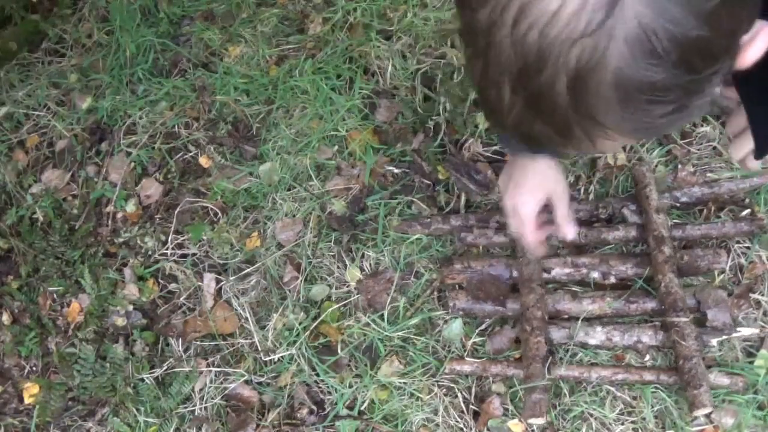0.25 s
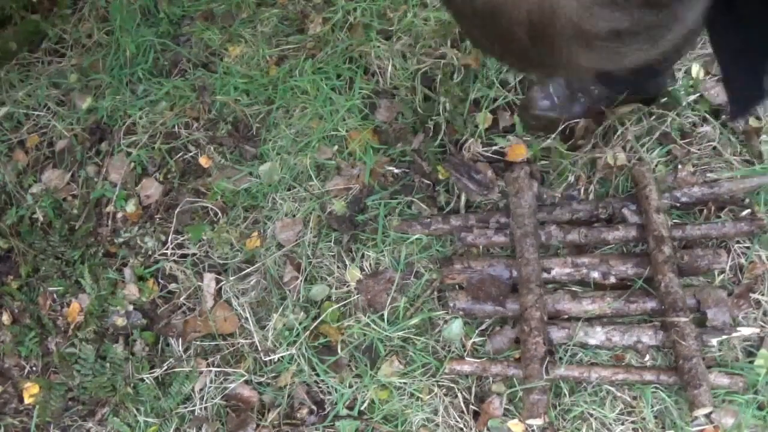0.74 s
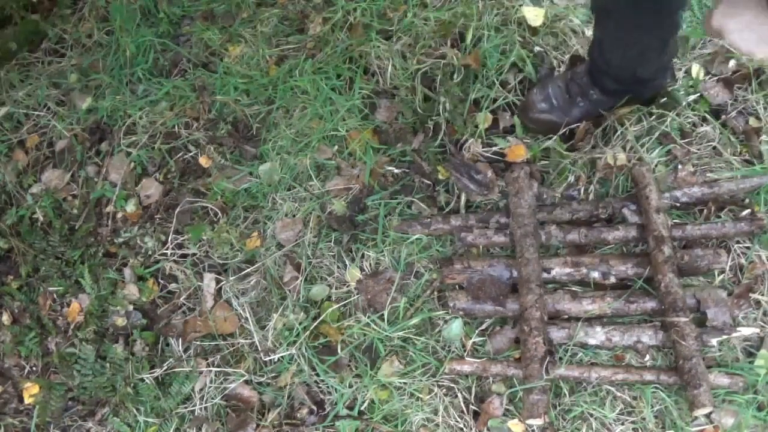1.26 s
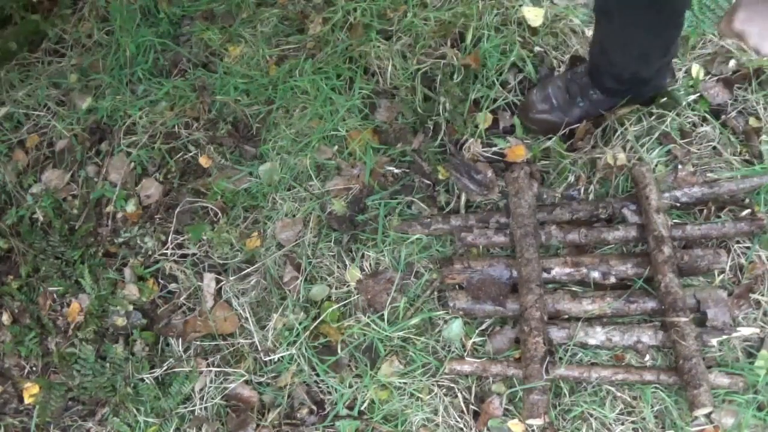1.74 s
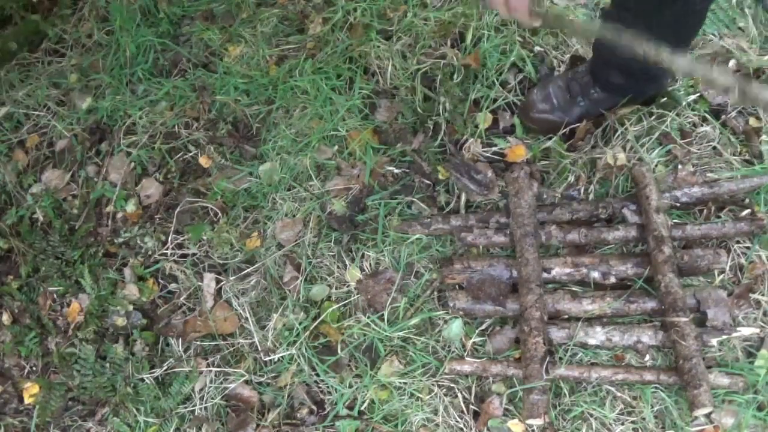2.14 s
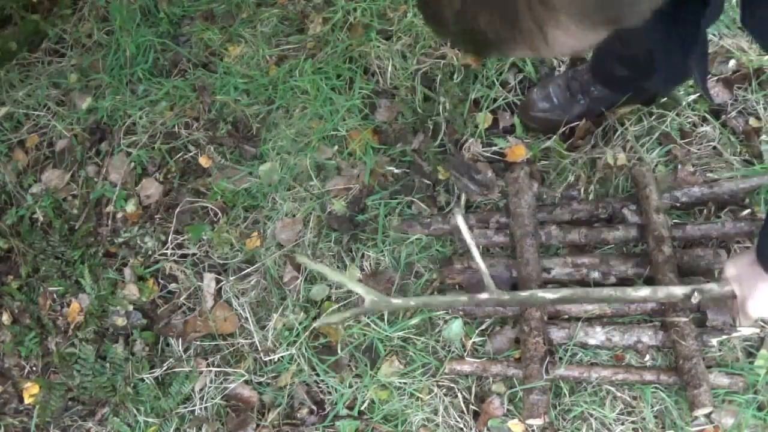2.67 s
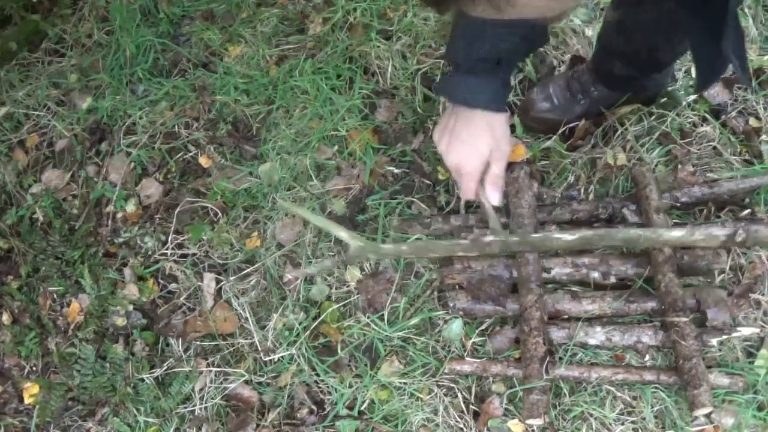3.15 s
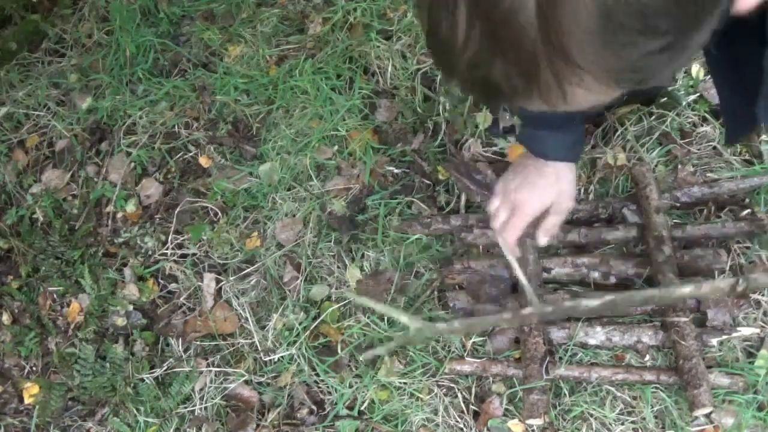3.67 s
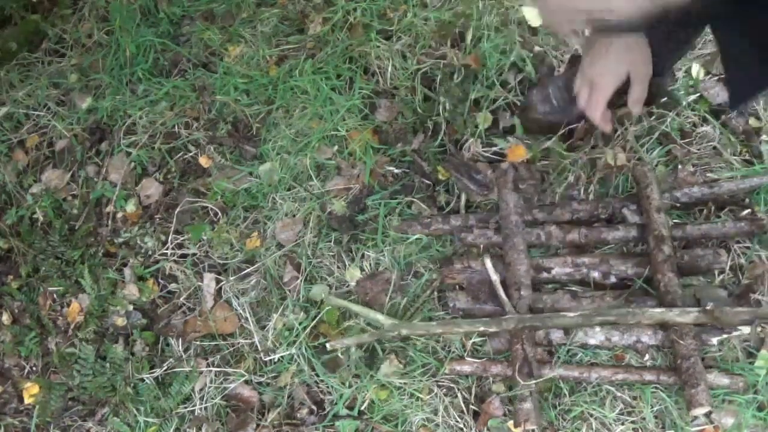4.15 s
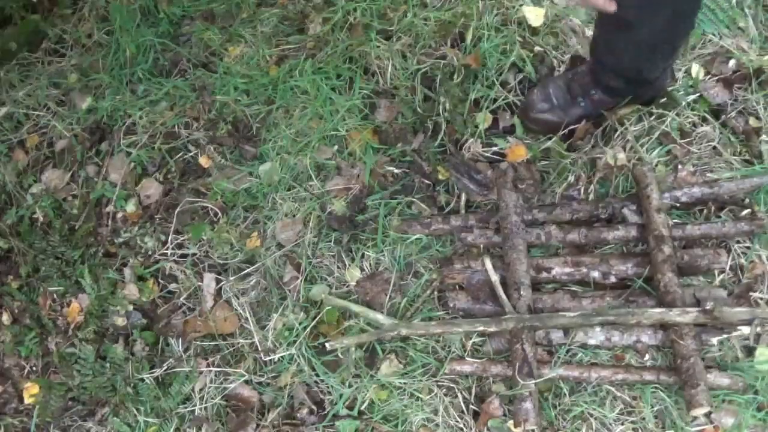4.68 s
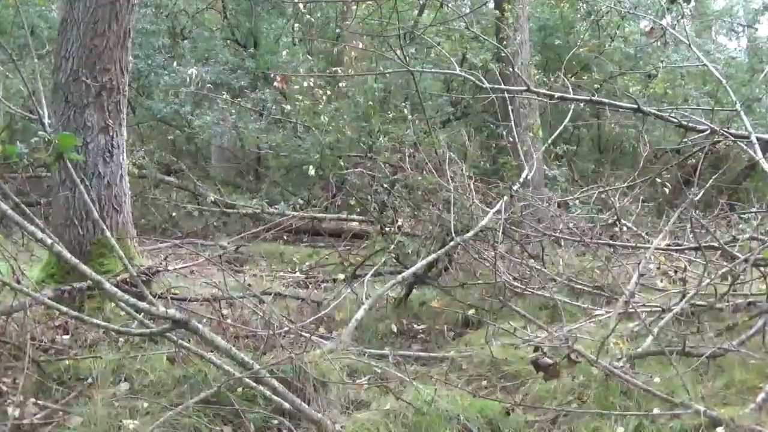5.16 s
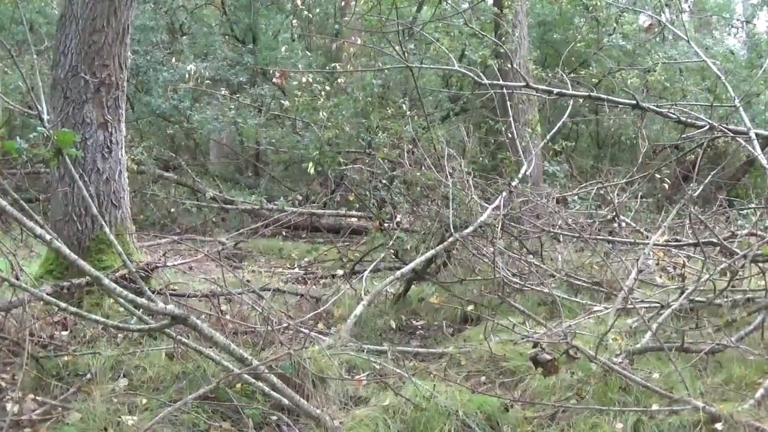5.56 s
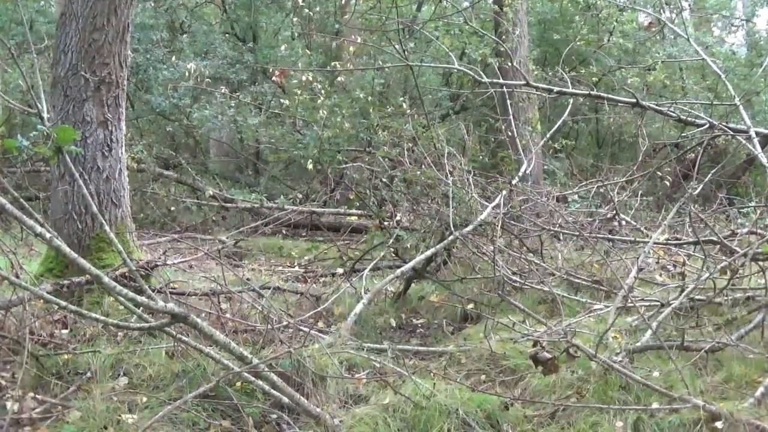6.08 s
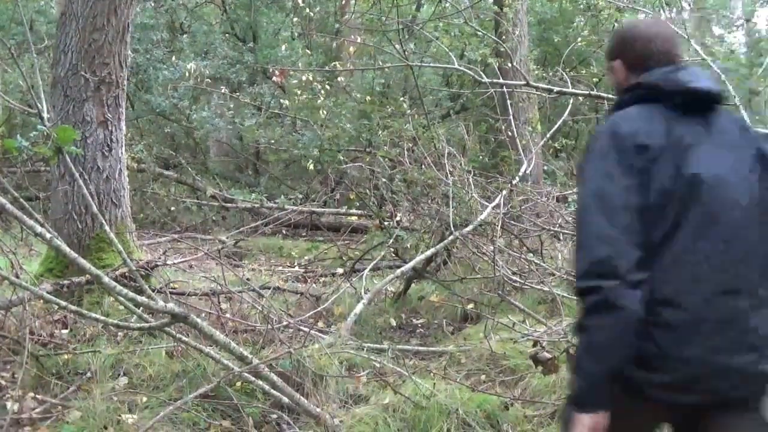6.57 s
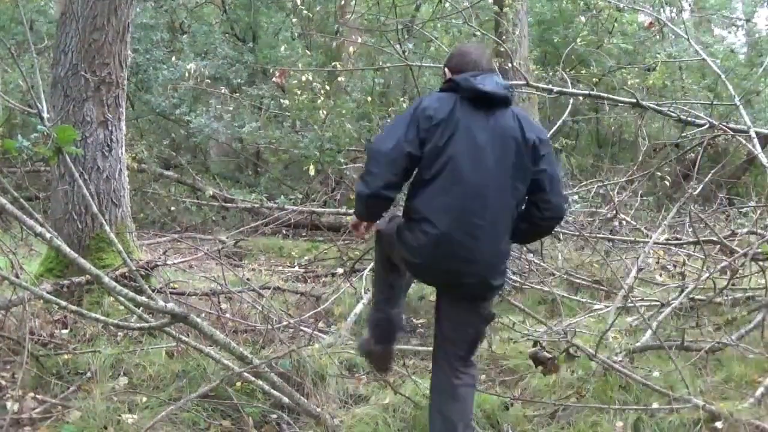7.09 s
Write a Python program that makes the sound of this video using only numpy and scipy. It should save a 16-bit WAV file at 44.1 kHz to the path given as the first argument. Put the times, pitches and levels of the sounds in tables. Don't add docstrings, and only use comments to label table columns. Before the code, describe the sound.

Wind rushes through leaves while sticks are laid down with small sharp taps; suddenly wider, footsteps pass, cracking twigs and knocking wood.

```python
import sys
import numpy as np
from scipy import signal
from scipy.io import wavfile
from scipy.ndimage import uniform_filter1d

SR = 44100
rng = np.random.default_rng(int(sys.argv[2]) if len(sys.argv) > 2 else 0)


def nominal_scale(level):
    x = np.asarray(level, float) / 20
    return 10 ** x


def file_out(sig):
    cols = np.atleast_2d(sig).T
    lim = np.clip(cols, -1, 1)
    pcm = np.round(lim * 32767).astype(np.int16)
    wavfile.write(sys.argv[1], SR, pcm)


N = 323241
CUT_S = 5.1806

NEAR_WIND = [(12, -43), (20, -10), (75, -9), (134, -3.5), (194, -1.5), (295, -2), (706, -1.5), (1480, -6),
             (1690, -7.5), (2790, -2.5), (4980, -5), (5990, -8.5), (6660, -12), (8670, -14.5),
             (11000, -20.5), (14300, -57), (22000, -120)]
# freq_hz, level_db_per_hz
WIDE_WIND = [(12, -42), (20, -12), (97, -3.5), (303, -0.5), (488, -2), (557, 0), (619, -1), (1020, -3),
             (1110, -4.5), (3350, 0), (5690, -5.5), (10200, -17), (11000, -19), (14300, -52), (22000, -120)]
NEAR_LIKENESS = [(60, 1), (110, 0.97), (190, 0.97), (350, 0.96), (620, 0.91), (1120, 0.82), (2010, 0.7),
                 (3610, 0.79), (6480, 0.64), (11600, 0.68)]
NEAR_LEAN = [(60, -0.5), (110, 0), (190, -0.5), (350, -1.0), (620, -0.5), (1120, -1.8), (2010, -1.8),
             (3610, -2.6), (6480, -0.9), (11600, 0.5)]
# freq_hz, left_minus_right_db
WIDE_LEAN = [(60, -0.5), (110, -0.5), (190, -0.5), (350, -0.64), (620, -1.0), (1120, -1.8), (2010, -0.69),
             (3610, -1.0), (6480, 0.062), (11600, -0.37)]
# start_s, peak_db, ring_hz, left_minus_right_db
STICK_TICKS = [(0.025, -33, 2580, -2.5), (0.0319, -14.5, 4660, -4), (0.0516, -32, 2440, -2.5),
               (0.505, -28, 4390, -1.5), (0.6714, -29, 4150, -2.5), (0.775, -28, 4100, -1.5),
               (2.417, -29, 2510, -2.5), (2.4988, -24, 2240, -3.0), (3.1004, -30, 2990, -9),
               (3.1594, -35, 3250, -5), (3.4454, -29, 2830, -2.5), (4.2901, -27, 5100, -2.5),
               (4.481, -22, 3450, -4), (4.9625, -26, 2600, -2.5)]
# middle_s, level_db, centre_hz, half_length_s
BARK_SCRAPES = [
    (0.0375, -34, 3540, 0.0037),
    (0.051, -38, 2250, .0015),
    (.058, -42, 2250, .01),
    (0.672, -50, 3300, 0.014),
    (.778, -44, 6500, 0.0041),
    (2.5, -42, 1500, 0.0023),
    (2.5, -40, 4100, 0.0011),
    (3.103, -44, 10300, .003),
    (4.482, -43, 5500, 0.001),
    (4.475, -41, 3900, .015),
]
# middle_s, level_db, centre_hz, half_length_s
TWIG_SNAPS = [(5.389, -47, 10000, 0.0031), (5.57, -51, 8000, .003), (5.905, -43, 2950, 0.0038),
              (6.081, -38, 4800, .001), (6.112, -41.5, 9500, .005), (6.324, -45, 9000, .003),
              (6.3305, -32, 5730, 0.0029), (6.3357, -35, 5900, .0035), (6.348, -39, 5000, .004),
              (6.44, -36.5, 3800, .005), (6.449, -31.5, 5600, .006), (6.4505, -36.5, 2100, 0.0035),
              (6.465, -33, 3900, .005), (6.496, -40.5, 4500, 0.0027), (6.566, -39, 8500, 0.0037),
              (6.564, -36, 2900, 0.0027), (6.597, -48, 7600, .005), (6.612, -31.5, 8550, .006),
              (6.652, -38, 3260, 0.0057), (6.743, -42.5, 3300, .012), (6.925, -45, 8500, .015),
              (6.952, -44, 9500, 0.0055), (6.997, -46, 8500, 0.0043), (7.306, -42, 6000, .0025),
              (7.3125, -32.5, 8000, 0.0043), (7.329, -30, 4500, .003)]
# start_s, peak_db, ring_hz
WOOD_KNOCKS = [
    (5.478, -38, 393),
    (5.678, -39, 660),
    (6.104, -30.5, 1080),
    (6.1063, -26, 400),
    (6.109, -27, 744),
    (6.181, -32, 328),
    (6.33, -32, 790),
    (6.34, -32, 610),
    (6.732, -38, 815),
]
# full_weight_s, level_db, press_s
LITTER_STEPS = [
    (5.92, -61, .12),
    (6.15, -49, 0.081),
    (6.42, -40, 0.077),
    (6.64, -38, 0.058),
    (6.94, -47, 0.094),
    (7.1, -48.5, .1),
    (7.33, -39, .035),
]


def evened(x):
    return x / np.sqrt(np.mean(x ** 2) + 1e-20)


def read(points, hz):
    f, value = np.transpose(points)
    return np.interp(np.log(hz + 1), np.log(f + 1), value)


def add(mix, start_s, sound, pan_db):
    part = mix[:, round(start_s * SR):][:, :sound.shape[-1]]
    part += (sound * nominal_scale([[pan_db / 2], [-pan_db / 2]]))[:, :part.shape[1]]


def ring(hz, t60, size=2048):
    t = np.arange(size) / SR
    swell = np.minimum(hz * t, 1) ** 2
    return nominal_scale(-60 * t / max(t60, 1e-4)) * np.sin(2 * np.pi * hz * t) * swell


def leaves(level_rows, roar_rows, colour, likeness, lean, patchy_db, flicker_db):
    frames, hz = N // 256 + 5, np.fft.rfftfreq(1024, 1 / SR)
    t = np.arange(frames) * 256 / SR
    a, b, c, d, patches = rng.standard_normal((frames, 513, 5)).T
    patches = uniform_filter1d(patches, size=8, axis=0)
    patches = evened(uniform_filter1d(patches, size=10, axis=1))
    flicker = evened(uniform_filter1d(rng.standard_normal(frames), size=2))

    left = a + 1j * b
    right = likeness * left + np.sqrt(1 - likeness ** 2) * (c + 1j * d)
    z = np.array([left, right])
    low = 1 / (1 + (hz[:, None] / 1350) ** 4)
    level_db = read(colour, hz)[:, None] + low * np.interp(t, *np.transpose(roar_rows))
    z *= nominal_scale(level_db + patchy_db * patches + flicker_db * flicker * (0.5 - low))
    z *= nominal_scale(np.array([.5, -.5])[:, None, None] * read(lean, hz)[:, None])
    x = signal.istft(z, nperseg=1024, noverlap=768)[1][:, :N]

    bandpass = signal.butter(4, [1500, 6500], "band", fs=SR, output="sos")
    band = signal.sosfilt(bandpass, x.mean(0))
    return x / band.std() * nominal_scale(np.interp(np.arange(N) / SR, *np.transpose(level_rows)))


def rush():
    t = np.linspace(0, N / SR, 200)
    opens_s, gust_s = 2.35, 4.9
    gust = np.clip((t - gust_s) / (CUT_S - gust_s), 0, 1)
    near_db = -42.5 + 1.34 * np.maximum(t - opens_s, 0) + 1 * gust ** 2

    open_s = 6.37
    wide_db = -46.5 + 7.5 * (np.minimum(t, open_s) - CUT_S)
    wide_db += -1.06 * np.clip(2 * (t - open_s), 0, 1)

    s = np.arange(40) * 0.3
    surge_s, surge_width_s = 4.45, 0.35
    surge = np.exp(-((s - surge_s) / surge_width_s) ** 2)
    roar = np.transpose([s, 0.5 * rng.standard_normal(40) + 1.2 * surge])

    likeness = np.clip(read(NEAR_LIKENESS, np.fft.rfftfreq(1024, 1 / SR)), -1, 1)[:, None]
    near = leaves(np.transpose([t, near_db]), roar, NEAR_WIND, likeness, NEAR_LEAN,
                  patchy_db=0.56, flicker_db=0.5)
    wide = leaves(np.transpose([t, wide_db]), roar, WIDE_WIND, 0, WIDE_LEAN,
                  patchy_db=1.5, flicker_db=1.3)
    since_s = np.arange(N) / SR - CUT_S
    return np.where(since_s < 0, near, wide * np.clip(.2 + since_s / 0.0043, 0, 1))


def ticks():
    bark_cycles = 14.8
    out = np.zeros((2, N))
    chance = rng.standard_normal((len(STICK_TICKS), 2, 2048))
    for (s, db, hz, pan_db), grit in zip(STICK_TICKS, chance):
        t60 = bark_cycles / hz
        tap = ring(hz, t60)
        tap += 0.5 * ring(hz * 0.46, t60 * 1.46)
        tap += 0.28 * ring(min(hz * 2.2, 10500), t60 * 0.49)
        scatter = grit * nominal_scale(-33 - 60 * np.arange(2048) / SR / 0.055)
        scattered = signal.fftconvolve(scatter, tap[None], axes=1)[:, :2048]
        add(out, s + .0006, nominal_scale(db + 1.5) * (tap + scattered), pan_db)
    return out


def crackles(events, ears, spread_db):
    out, t = np.zeros((2, N)), np.arange(4096) / SR
    chance = rng.random((len(events), 3, ears, 4096))
    for (s, db, hz, pan_db, half_s), (when, size, side) in zip(events, chance):
        half_s = np.clip(half_s, .001, .015)
        struck = when < 6000 / SR
        cracks = struck * np.sign(side - .5) * nominal_scale(-abs(spread_db) * np.log(size + 0.043))
        fibre = ring(hz, 0.0019, size=256)
        fibre += hz / 7500 * ring(9240, 0.0011, size=256)
        fibre += 0.9 * ring(2150, 0.0019, size=256)
        clump = evened(signal.fftconvolve(cracks, fibre[None], axes=1)[:, :4096])
        swell = np.exp(-(t / half_s - 2) ** 2)
        add(out, s - 2 * half_s, nominal_scale(db) * clump * swell * np.ones((2, 1)), pan_db)
    return out


def scrapes():
    rows = [(s, db, hz, -2.2, half_s) for s, db, hz, half_s in BARK_SCRAPES]
    return crackles(rows, ears=1, spread_db=-2.0)


def walker_pan(s):
    pass_s, width_s = 6.33, 0.3
    return -7.5 * np.exp(-((s - pass_s) / width_s) ** 2)


def snaps():
    rows = [(s, db, hz, walker_pan(s), half_s) for s, db, hz, half_s in TWIG_SNAPS]
    return nominal_scale(2.5) * crackles(rows, ears=2, spread_db=-2.5)


def knocks():
    out, t60 = np.zeros((2, N)), 0.024
    for s, db, hz in WOOD_KNOCKS:
        blow = ring(hz, t60) + 0.64 * ring(hz * 1.65, t60 * 0.86)
        pair = np.array([np.roll(blow, 9), blow])
        add(out, s - .001, nominal_scale(db + 2) * pair, walker_pan(s))
    return out


def litter(per_s=3000, spread_db=-5.5):
    out = np.zeros((2, N))
    for hz in (4230, 6000, 7560, 9000, 10300):
        size = nominal_scale(abs(spread_db) * np.minimum(rng.exponential(1, (2, N)), 4))
        grains = size * (rng.random((2, N)) < per_s / SR) * rng.choice([-1, 1], (2, N))
        out += signal.oaconvolve(grains, ring(hz, 0.0022, size=128)[None], axes=1)[:, :N]
    t, weight = np.arange(N) / SR, np.zeros(N)
    for s, db, press_s in LITTER_STEPS:
        width_s = np.where(t < s, press_s, 0.89 * press_s)
        weight += nominal_scale(db) * np.exp(-((t - s) / width_s) ** 2)
    return evened(out) * weight


def scene():
    return rush() + ticks() + scrapes() + snaps() + knocks() + litter()


def roll_off(x):
    return signal.sosfilt(signal.butter(12, 12240, fs=SR, output="sos"), x)


def record(dry):
    edge = signal.firwin(1023, 11037, window=("kaiser", 8), fs=SR)[None]
    limited = []
    for take in np.split(dry, [round(CUT_S * SR)], axis=1):
        padded = np.pad(take, ((0, 0), (511, 511)), "reflect", reflect_type="odd")
        limited.append(signal.oaconvolve(padded, edge, "valid", axes=1))
    return roll_off(np.hstack(limited))


dry = scene()
out = record(dry)
file_out(out)
```